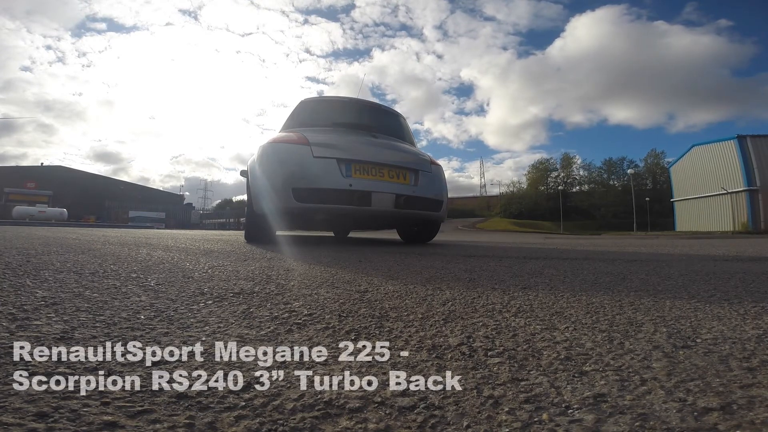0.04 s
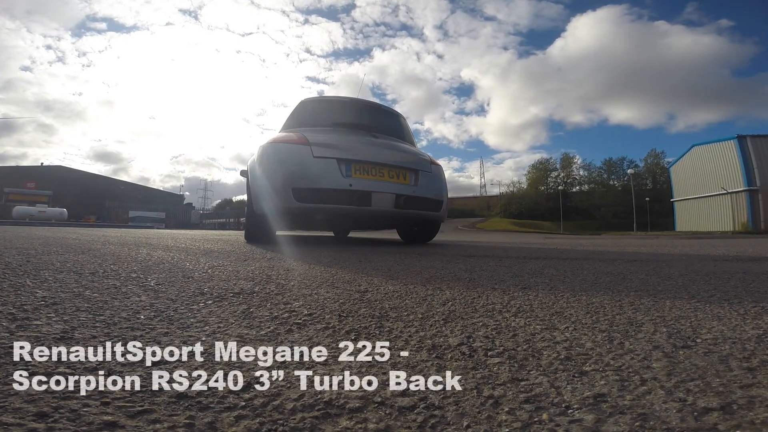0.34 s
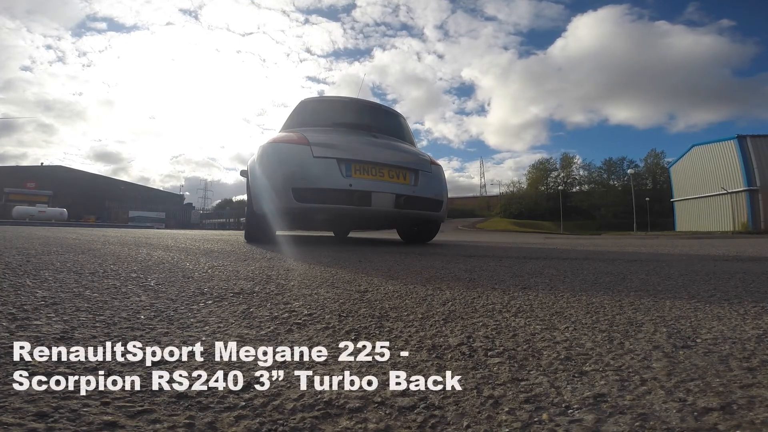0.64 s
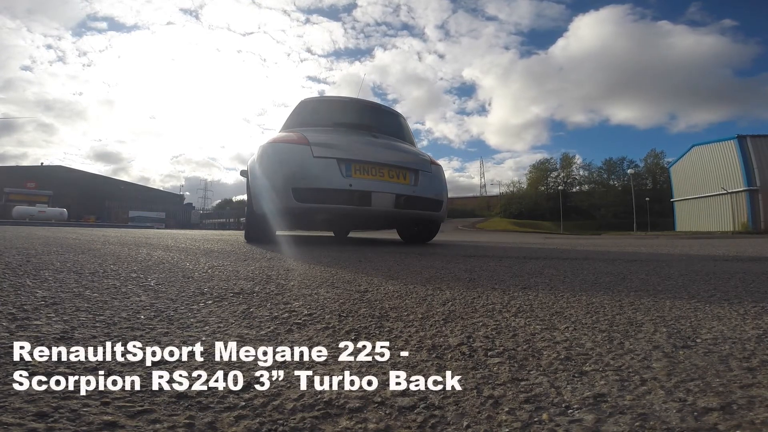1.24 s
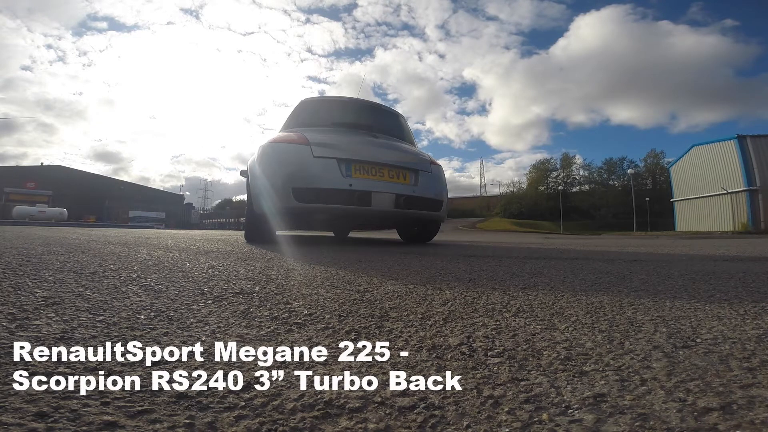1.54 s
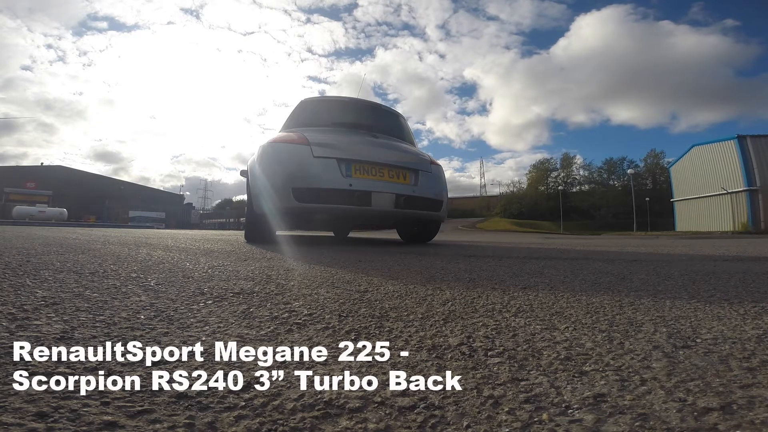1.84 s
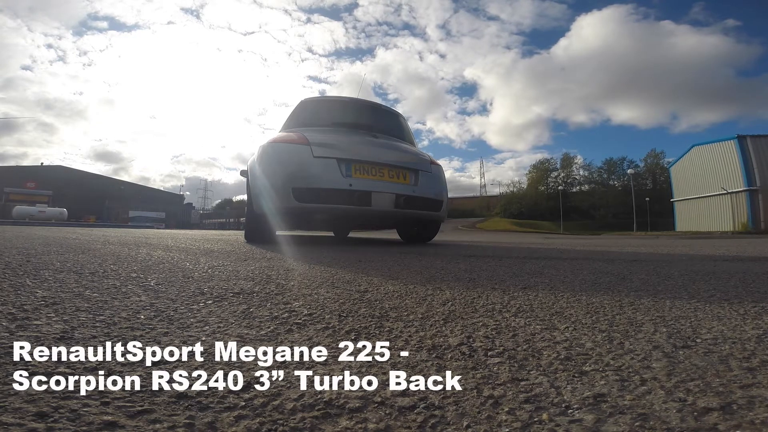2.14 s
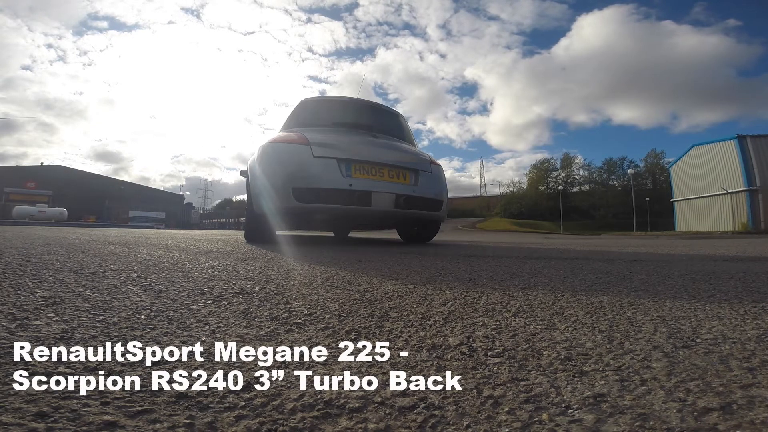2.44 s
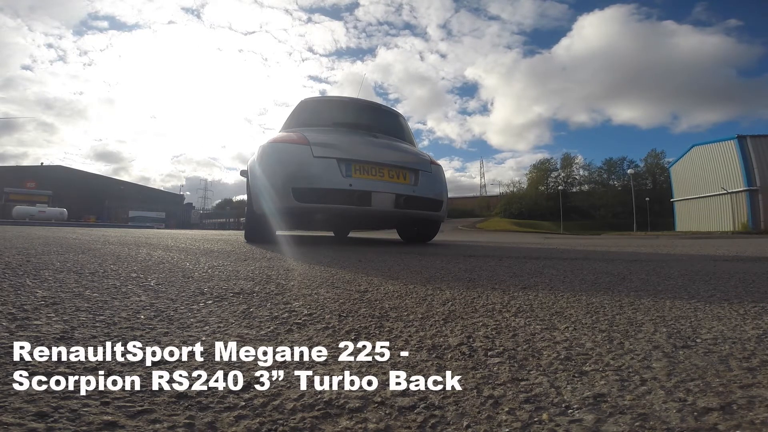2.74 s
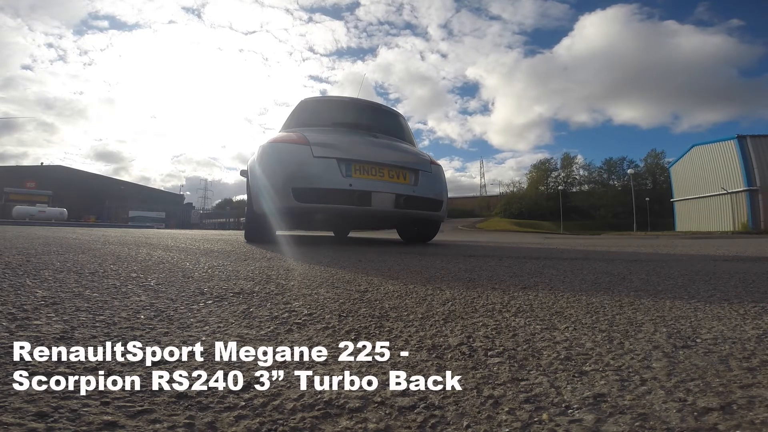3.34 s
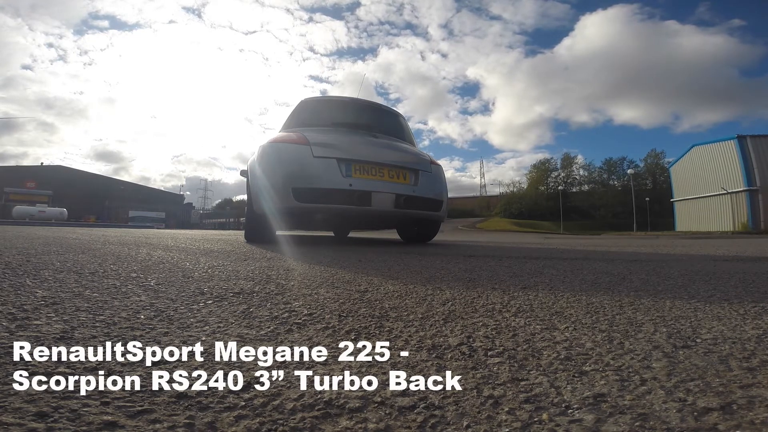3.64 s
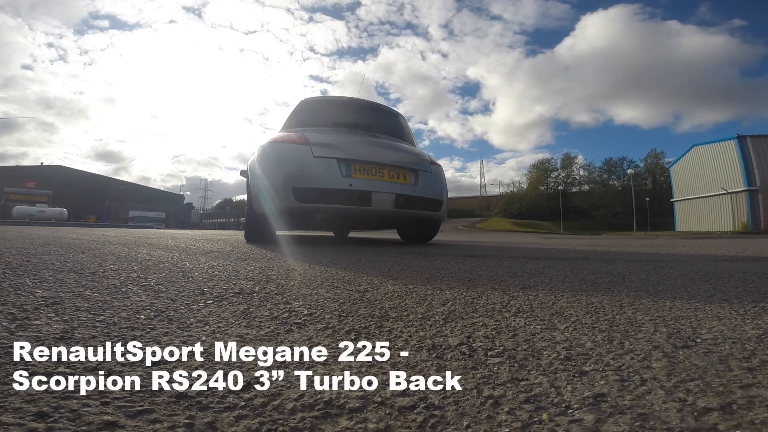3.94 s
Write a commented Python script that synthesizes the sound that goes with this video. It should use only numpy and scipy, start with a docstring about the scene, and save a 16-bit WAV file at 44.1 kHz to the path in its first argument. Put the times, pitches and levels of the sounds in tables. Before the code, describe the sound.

A parked car engine revs up from idle, then falls slowly with soft exhaust burbles. It revs again, harder and raspier, ending in a rush of turbo air and quick loud bangs, heard from behind outdoors.

```python
"""Revving a parked turbo car

A four-cylinder car, heard from behind on open tarmac, is blipped from idle and then revved hard.
Each firing booms in the exhaust pipe and rasps under throttle; gas rushes on as the turbo runs down.
Fuel igniting in the pipe burbles as the revs fall. At the second lift-off the turbo chirps, then
the pipe bangs."""
import sys
import numpy as np
from scipy import signal
from scipy.fft import rfft, irfft, next_fast_len
from scipy.io import wavfile
from scipy.ndimage import map_coordinates

SR = 44100
rng = np.random.default_rng(int(sys.argv[2]) if len(sys.argv) > 2 else 0)


def transcribe(u):
    """Save the signal u as a 16-bit wav file named by the first command-line argument.

    u: samples, shape (n,) or (channels, n), limited to [-1, 1]; the rate is SR.
    q: integer samples, one column per channel.
    """
    v = np.clip(np.atleast_2d(u).T, -1, 1)
    q = np.round(v * 32767).astype(np.int16)
    wavfile.write(sys.argv[1], SR, q)


N = 176400


def amp(db):
    """Turn decibels into a gain to multiply by."""
    return 10 ** (np.asarray(db) / 20)


def unit(x):
    """Scale a sound to an average (rms) level of 1."""
    return x / np.sqrt(np.mean(x ** 2) + 1e-20)


def curve(rows):
    """Join (time [s], value) rows with straight lines, one value per sample."""
    return np.interp(np.arange(N) / SR, *np.transpose(rows))


def along(points, hz):
    """Read between (frequency [Hz], value) points on a logarithmic pitch scale."""
    freqs, values = np.transpose(points)
    return np.interp(np.log(hz + 1), np.log(freqs + 1), values)


def wobble(rate):
    """A smooth curve through `rate` random values a second."""
    return map_coordinates(rng.standard_normal(int(N * rate / SR) + 4), [np.arange(N) * rate / SR])


def filtered(x, response):
    """Multiply each frequency in x by response(frequency)."""
    size = next_fast_len(N + SR // 2)
    return irfft(rfft(x, size) * response(np.fft.rfftfreq(size, 1 / SR)), size)[:N]


def noise(colour):
    """Noise of level 1 with the given colour: its balance of low and high frequencies."""
    return unit(filtered(rng.standard_normal(N), lambda hz: amp(along(colour, hz))))


def ringing(colour, ratio=1, size=16384):
    """The ring after one sharp tap, with the given colour and its frequencies times ratio."""
    cepstrum = irfft(np.log(amp(along(colour, np.fft.rfftfreq(size, 1 / SR) / ratio))))
    cepstrum[1:size // 2] *= 2  # folding this in half puts all the ringing after the tap
    cepstrum[size // 2 + 1:] = 0
    return irfft(np.exp(rfft(cepstrum)))[:size // 2]


def firings(rate, cycles, throttle):
    """The cylinders push out pulses of gas: steady under throttle, uneven when coasting."""
    # strength of the pulses (time [s], relative level [dB])
    effort = [(0, -39.5), (.12, -19), (.25, -9.5), (.45, -1.5), (.56, 3.5), (.67, 6), (.78, -4),
              (1.0, -6.5), (2.3, -13.5), (2.75, -19), (2.92, -14), (3.05, -4), (3.22, 4.5), (3.4, 5.5),
              (3.5, 8), (3.71, 16.5), (3.78, 8), (3.9, 1.5)]
    # smooth pumping of the cylinders at the firing rate (time [s], level [dB])
    pumping = [(0, -46), (.27, -27), (.6, -72), (.8, -28.5), (1.3, -37), (1.75, -29.5), (2.3, -34),
               (2.6, -44), (3.0, -50), (3.3, -64)]
    weak_db, late_cycles, jitter_s = -8, 0.03, 0.00073
    count = np.arange(1, int(cycles[-1]))
    at = np.interp(count, cycles, np.arange(N))  # each firing's place, in samples
    load, local_rate = throttle[at.astype(int)], rate[at.astype(int)]
    size_luck, time_luck = rng.standard_normal((len(count), 2)).T
    weak = count % 2 * load  # every second firing is weaker and later under throttle
    uneven = (1 - load) ** 2
    scatter = 0.13 + 0.79 * uneven
    size = amp(weak_db * weak) * (1 + scatter * size_luck) * SR / local_rate / 2
    at = at + SR * (late_cycles * weak / local_rate + jitter_s * uneven * time_luck)
    pulses = np.bincount(np.clip(at, 0, N - 1).astype(int), size, N) * amp(curve(effort) - 26.5)
    throb = 1 + .28 * wobble(30.14)
    return pulses + amp(curve(pumping)) * np.cos(2 * np.pi * cycles) * throb


def exhaust_pipe(pulses, throttle):
    """The pulses ring the pipe: a low boom, and a rough bark that grows under load."""
    # how strongly the hot pipe rings (frequency [Hz], gain [dB])
    pipe = [(15, -44), (32, -9), (48, 0), (82, 1.5), (108, 3.5), (135, -5), (158, -4), (182, -2.5),
            (210, -11), (245, -3), (272, -2.5), (312, 6), (348, -5.5), (400, -26.5), (470, -16.5),
            (555, -10), (640, -32), (765, -8.5), (870, -29), (965, -15), (1150, -37.5), (5000, -72)]
    # strength of the upper overtones (time [s], gain [dB])
    bark = [(.05, -14), (.3, -0.5), (.65, -2.5), (.8, -6), (2.95, -12), (3.05, -3.5), (3.71, 3),
            (3.77, -16)]
    cool_ratio = 0.909  # the pipe rings lower as the gas cools with the throttle shut
    delay_s, full_delay_hz = 0.00348, 800  # echoes in the silencer hold back the higher overtones
    bark_above_hz, rough_db = 390, 2.5
    hot = signal.fftconvolve(pulses * throttle, ringing(pipe))
    cool = signal.fftconvolve(pulses * (1 - throttle), ringing(pipe, cool_ratio))
    lag_cycles = lambda hz: np.cumsum(np.minimum(hz / full_delay_hz, 1) * delay_s) * hz[1]
    note = filtered((hot + cool)[:N], lambda hz: np.exp(-2j * np.pi * lag_cycles(hz)))
    boom = filtered(note, lambda hz: 1 / (1 + (hz / bark_above_hz) ** 10))
    return boom + (note - boom) * amp(curve(bark) + rough_db * wobble(150))


def tailpipe_rasp(rate, cycles, throttle):
    """The swirling jet at the tailpipe hisses and spits a puff with each firing."""
    # colour of the jet (frequency [Hz], relative level [dB])
    jet = [(250, -27), (450, -7), (800, 2.5), (1200, -26), (1600, -24), (2500, -5), (3000, -17),
           (3500, -10), (3880, -19), (4500, -11.5), (7300, -15.5), (8250, -30), (9600, -25), (15000, -51)]
    # strength of the rasp (time [s], level [dB])
    loudness = [(0, -68), (.11, -49.5), (.28, -43), (.5, -44.5), (.66, -39), (.73, -70), (2.98, -53),
                (3.09, -43), (3.4, -40), (3.56, -38), (3.65, -26), (3.71, -21.5), (3.76, -63)]
    puff_peak_s, steady_share, weak_puff_db = 0.0019, 0.26, -5.5
    age = cycles % 1 / rate / puff_peak_s
    strength = amp(weak_puff_db * throttle * (np.floor(cycles) % 2))
    puffs = steady_share + strength * age * np.exp(1 - age)
    return noise(jet) * puffs * amp(curve(loudness))


def turbo_rush(flutter_db=1.26):
    """Gas rushes through the turbo in a slightly unsteady stream."""
    # colour of the rushing gas (frequency [Hz], relative level [dB])
    colour = [(200, -13), (500, 6.5), (610, -3.5), (860, 1.5), (1100, -4.5), (1650, 5), (2040, -8),
              (2560, 4.5), (2950, -10), (3470, -3.5), (3880, -13.5), (4600, -5.5), (5250, -16), (6000, -7),
              (6650, -26.5), (7400, -14), (8300, -37.5), (9600, -29.5), (15000, -44)]
    # strength of the flow (time [s], level [dB])
    flow = [(0, -65), (.25, -49.5), (.55, -44), (.76, -40.5), (1.3, -41.5), (2.3, -46), (2.95, -52),
            (3.2, -43), (3.45, -35.5), (3.66, -20.5), (3.78, -31.5), (4, -30.5)]
    return noise(colour) * amp(curve(flow) + flutter_db * wobble(45))


def background(air_db=-43):
    """Outdoor air and a faint electrical whine."""
    # colour of the air (frequency [Hz], relative level [dB])
    air = [(20, -8), (80, 11), (400, -20), (7000, -43), (9000, -44), (14500, -50)]
    # steady electrical tones (frequency [Hz], level [dB])
    whines = [(8780, -82), (14626, -82)]
    t = np.arange(N) / SR
    whine = sum(amp(db) * np.sqrt(2) * np.sin(2 * np.pi * hz * t) for hz, db in whines)
    return amp(air_db) * noise(air) + whine


def yard_echo(x, level_db=-12, rise_s=0.017, fade_s=0.099):
    """The sheds around scatter back a weak echo."""
    t = np.arange(SR // 2) / SR
    tail = rng.standard_normal(len(t)) * amp(-60 * t / fade_s) * (1 - np.exp(-t / rise_s))
    return amp(level_db) * signal.fftconvolve(x, tail / np.linalg.norm(tail))[:N]


def boost_dump(top_hz=6870):
    """The turbo dumps its pressure, and the fast gas makes the tailpipe sing."""
    # tones of the tailpipe (frequency [Hz], width [Hz], relative level [dB])
    tones = [(1454, 26, -5.5), (1639, 128, 5.5), (2162, 34, 1), (2565, 86, 3.5), (3010, 25, -1.5),
             (3386, 29, 1.5), (4730, 120, -10), (5900, 390, -20.5)]
    # strength of the singing (time [s], level [dB])
    loudness = [(0, -82), (.6, -48.5), (.76, -39.5), (1.4, -49), (3.1, -74.5), (3.55, -50), (3.7, -26.5),
                (3.8, -24.5), (3.9, -27), (4, -45)]

    def response(hz):
        peaks = sum(amp(db) * 1j * hz * width / (pitch ** 2 - hz ** 2 + 1j * hz * width)
                    for pitch, width, db in tones)
        return peaks / (1 + (hz / top_hz) ** 10)

    return unit(filtered(rng.standard_normal(N), response)) * amp(curve(loudness))


def rumble(throttle, level_db=-35):
    """Uneven burning shakes the pipe while the throttle is less than half open."""
    # colour of the rumble (frequency [Hz], relative level [dB])
    colour = [(22, -14), (46, 26.5), (60, 19.5), (200, -44)]
    return noise(colour) * np.clip(1 - 2 * throttle, 0, 1) * amp(level_db)


def pops(rows, colour, echo_db):
    """Fuel ignites in the pipe: a ringing thump, each at its own pitch, and a short crack of noise."""
    # colour of the crack (frequency [Hz], relative level [dB])
    crack_colour = [(200, -12), (600, -34), (1300, -2), (2500, -2), (3400, -6.5), (4300, -5), (7200, -7),
                    (8500, -23.5), (14000, -27.5)]
    push_s, crack_rise_s, crack_fall_s = 0.0023, 0.00082, 0.0032
    pitch_spread, echo_s = 0.033, 0.00762  # each pop bounces once along the pipe
    thump, crack = np.zeros(N + SR), np.zeros(N + SR)
    age = np.arange(SR // 8) / SR
    push = age * np.exp(-10 * age / push_s)  # the pressure builds and falls
    burst = (1 - np.exp(-age / crack_rise_s)) ** 2 * np.exp(-age / crack_fall_s)
    for (time, db, crack_db), luck in zip(rows, rng.standard_normal(len(rows))):
        ring = ringing(colour, np.exp(pitch_spread * luck))
        ring = ring / np.sqrt(np.mean(ring[:SR // 100] ** 2))  # level 1 over the first 10 ms
        ring = signal.fftconvolve(-ring, push / push.sum())
        for start, gain in [(time, amp(db)), (time + echo_s, amp(db + echo_db))]:
            thump[round(start * SR):][:len(ring)] += gain * ring
            crack[round(start * SR):][:len(age)] += gain * amp(crack_db) * burst / burst.max()
    return thump[:N] + crack[:N] * noise(crack_colour)


def burbles():
    """Soft misfires pop in the pipe as the revs fall."""
    # misfires (time [s], level [dB], crack compared with thump [dB])
    misfires = [(.966, -40, -24), (1.025, -29, -28), (1.078, -27.5, -22), (1.205, -26.5, -32),
                (1.225, -29, -30), (1.275, -31, -24), (1.327, -29.5, -14), (1.42, -49, 2),
                (1.435, -29.5, -22), (1.468, -29.5, -26), (1.51, -29, -22), (1.568, -30, -27),
                (1.595, -27.5, -24), (1.683, -40, -24), (1.725, -33, -24), (1.81, -33, -28),
                (2.022, -28.5, -23), (2.134, -30, -18), (2.2, -30, -26), (2.363, -28.5, -28),
                (2.412, -36, -9), (2.472, -27, -10.5), (2.617, -29, -21), (2.668, -32.5, -13),
                (2.775, -44.5, -2.5), (2.837, -34, -20), (2.868, -36, -23)]
    # colour of their thump (frequency [Hz], relative level [dB])
    colour = [(30, -11), (70, 14.5), (200, 0.5), (287, 10), (400, -12.5), (485, 7.5), (570, -12.5),
              (665, 2.5), (750, -8), (860, 2.5), (1100, -25), (3000, -37)]
    return pops(misfires, colour, echo_db=-10.5)


def turbo_chirp(peak_s=3.785, width_s=.032, pitch_hz=4950, width_hz=90, level_db=-32):
    """The turbo gives a brief, breathy whistle at the second lift-off."""
    whistle = filtered(rng.standard_normal(N), lambda hz: np.exp(-((hz - pitch_hz) / width_hz) ** 2))
    swell = np.exp(-((np.arange(N) / SR - peak_s) / width_s) ** 2)
    return amp(level_db) * unit(whistle) * swell


def bangs():
    """Fuel goes off loudly in the pipe after the hard rev."""
    # explosions (time [s], level [dB], crack compared with thump [dB])
    explosions = [(3.9075, -12, -14), (3.9435, -29, -14), (3.956, -8, -6), (3.9905, -19, -5)]
    # colour of their thump (frequency [Hz], relative level [dB])
    colour = [(30, -9), (100, 0), (260, 10), (420, -1), (570, -5.5), (680, 8.5), (740, 3), (900, 8),
              (1200, -34), (6000, -63)]
    return pops(explosions, colour, echo_db=-18)


def scene():
    """Engine speed and throttle drive the exhaust; turbo, pops, echo and air join it."""
    # engine speed (time [s], rate [firings per second])
    speed = [(0, 26), (.13, 34.2), (.3, 63), (.52, 99), (.68, 129), (.78, 137), (.89, 133), (1.04, 122.3),
             (1.63, 105.4), (2.45, 83.6), (2.91, 68), (3.0, 70.4), (3.19, 101.5), (3.48, 152.5), (3.7, 205),
             (3.76, 214), (4, 197)]
    # how far the throttle is open (time [s], opening [0-1])
    opening = [(0, 0.5), (.5, 0.8), (.72, 1), (.92, 0.1), (2.9, 0.14), (3.08, 0.66), (3.25, 0.99),
               (3.72, 0.95), (4, 0.86)]
    rate, throttle = curve(speed), curve(opening)
    cycles = np.cumsum(rate) / SR + .5  # running count of firings
    car = exhaust_pipe(firings(rate, cycles, throttle), throttle)
    car += tailpipe_rasp(rate, cycles, throttle) + turbo_rush() + boost_dump()
    car += turbo_chirp() + rumble(throttle) + burbles() + bangs()
    return (car + yard_echo(car) + background())[None]


def record(dry, top_hz=15140):
    """Clip any peaks past full scale and cut off the highest treble."""
    return filtered(np.clip(dry[0], -1, 1), lambda hz: hz < top_hz)[None]


dry = scene()
out = record(dry)
transcribe(out)
```